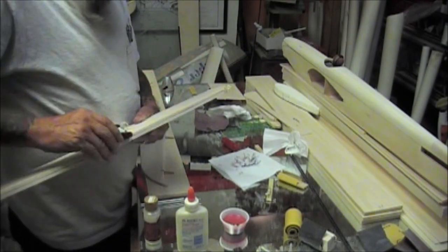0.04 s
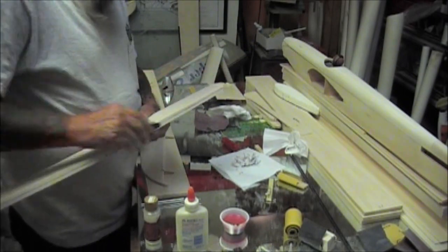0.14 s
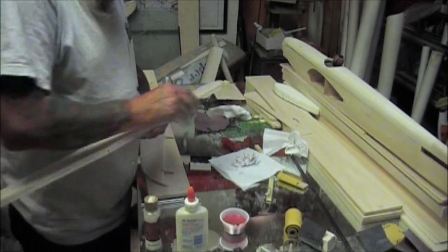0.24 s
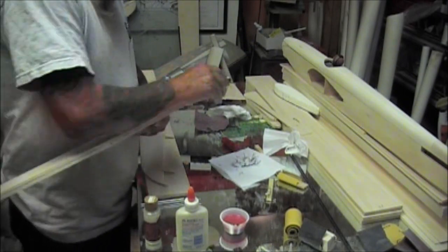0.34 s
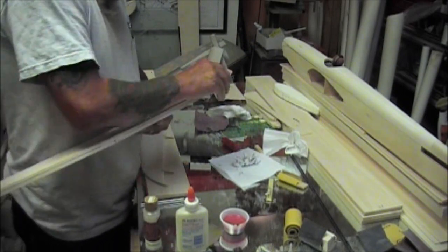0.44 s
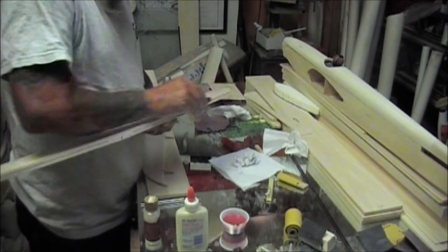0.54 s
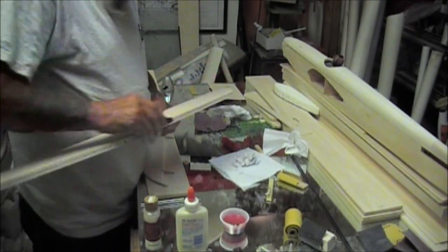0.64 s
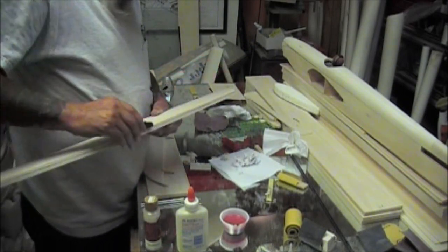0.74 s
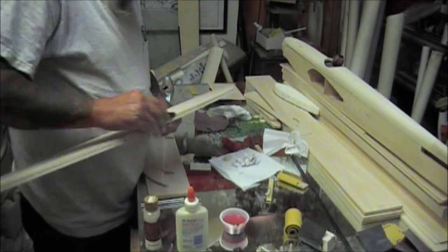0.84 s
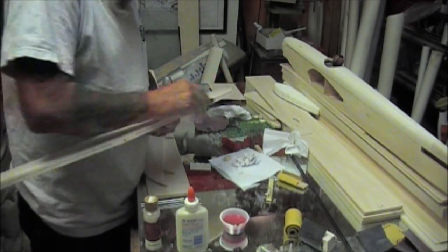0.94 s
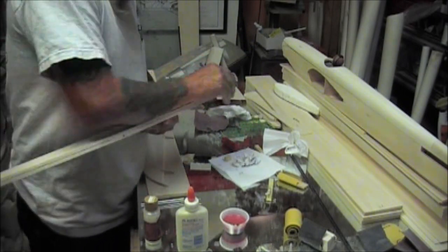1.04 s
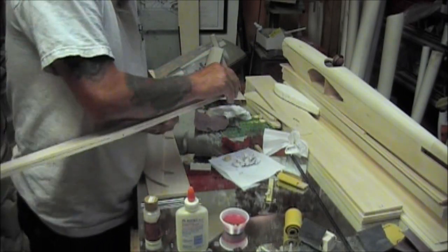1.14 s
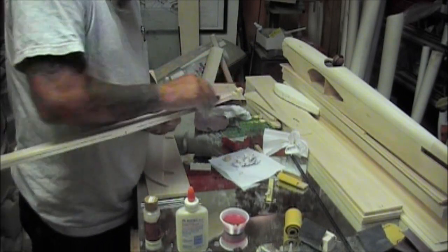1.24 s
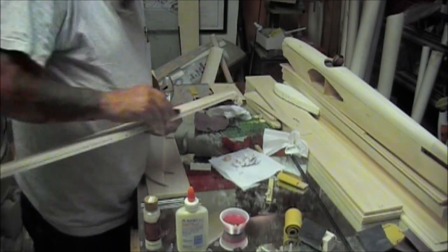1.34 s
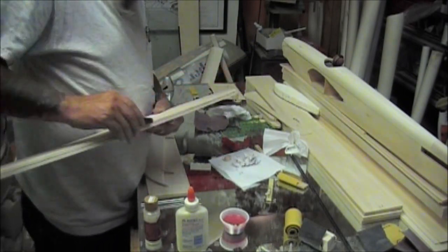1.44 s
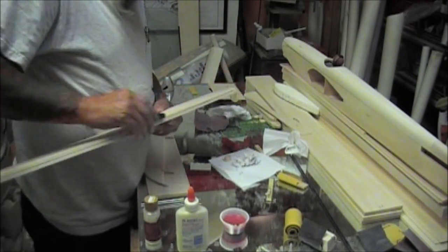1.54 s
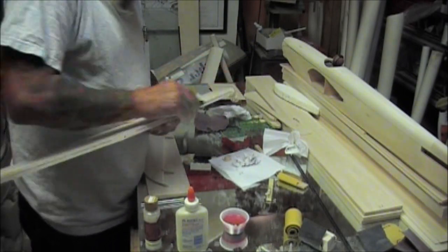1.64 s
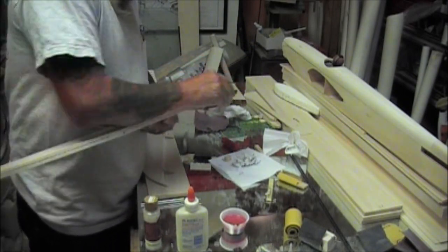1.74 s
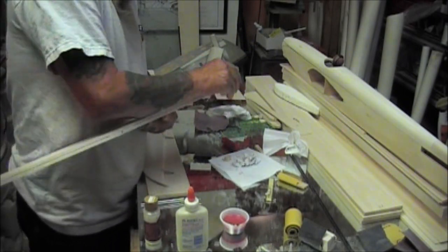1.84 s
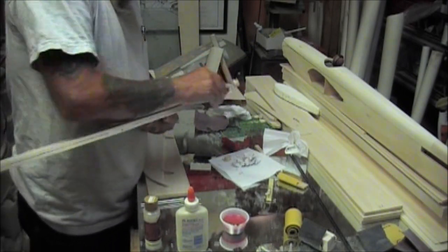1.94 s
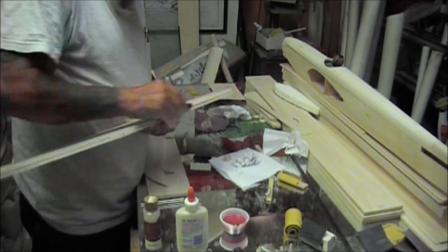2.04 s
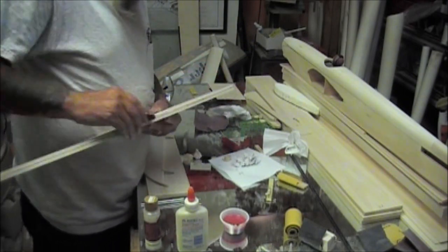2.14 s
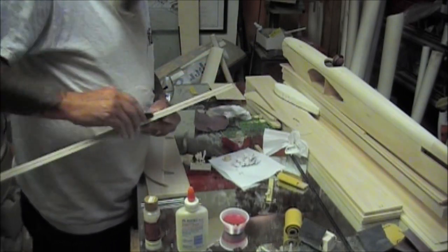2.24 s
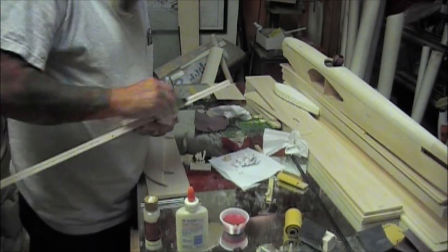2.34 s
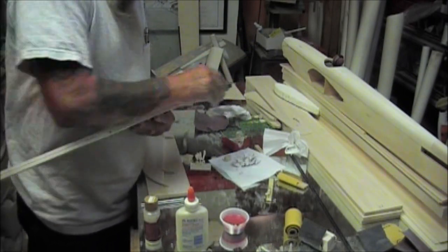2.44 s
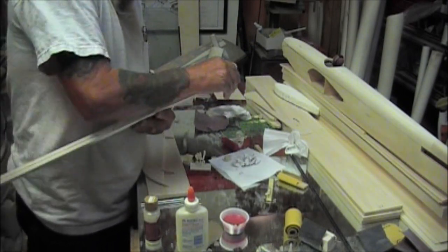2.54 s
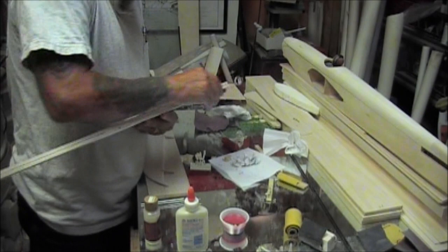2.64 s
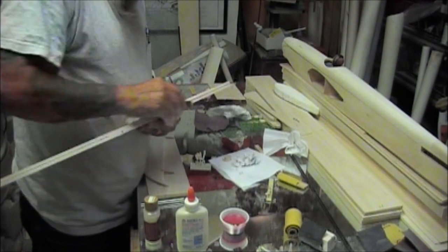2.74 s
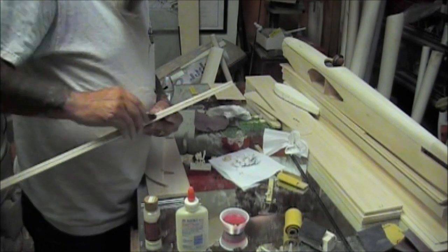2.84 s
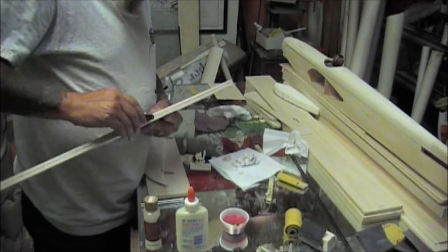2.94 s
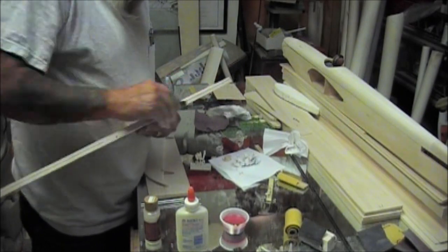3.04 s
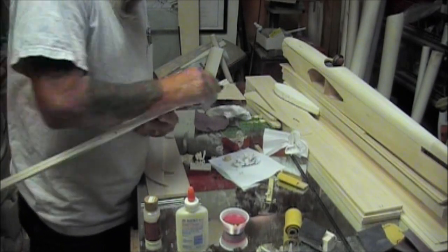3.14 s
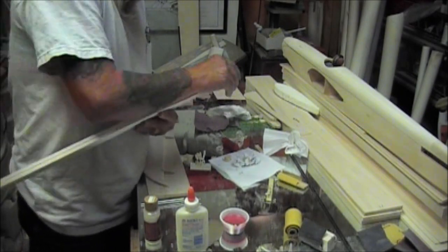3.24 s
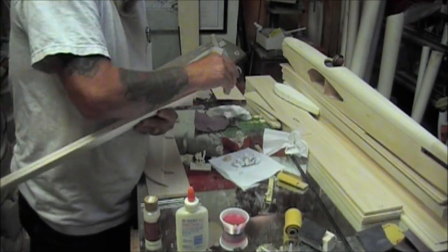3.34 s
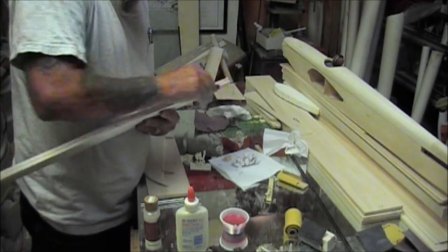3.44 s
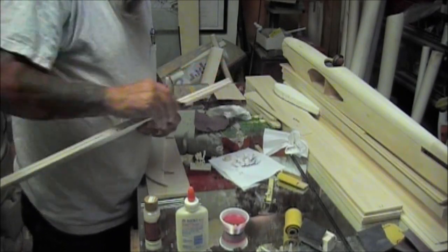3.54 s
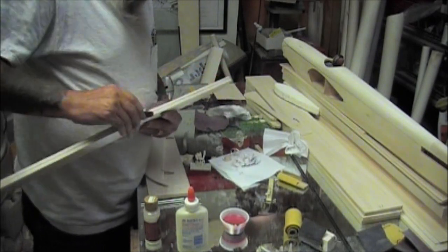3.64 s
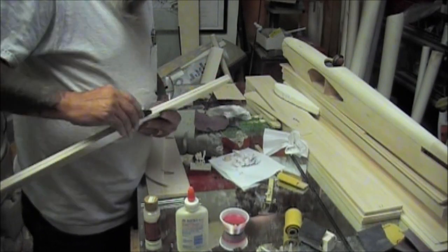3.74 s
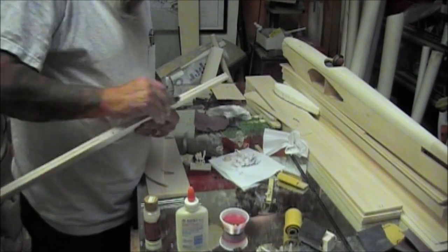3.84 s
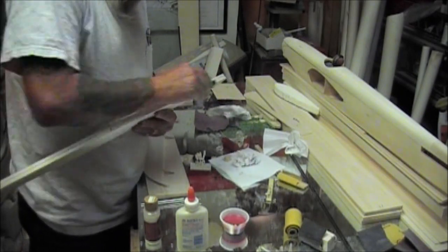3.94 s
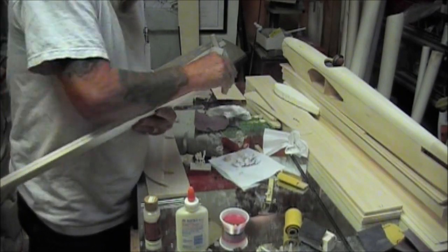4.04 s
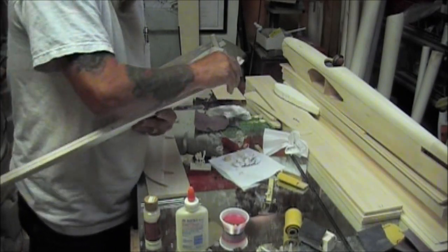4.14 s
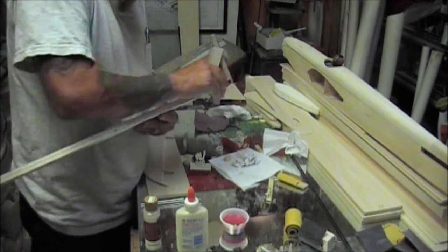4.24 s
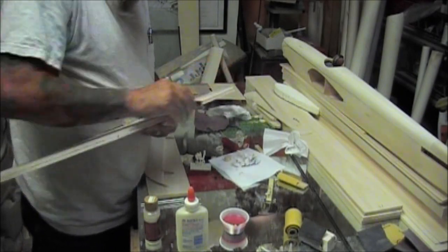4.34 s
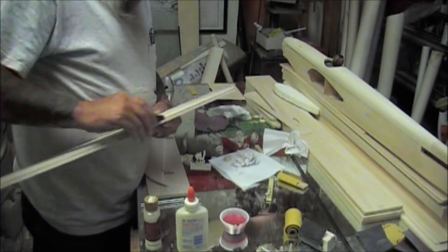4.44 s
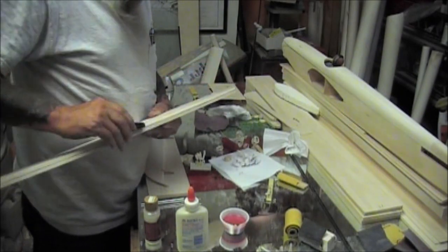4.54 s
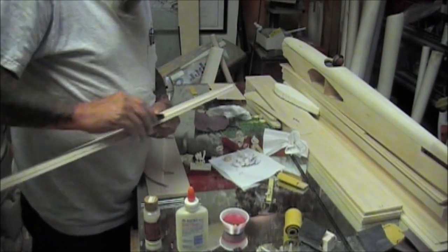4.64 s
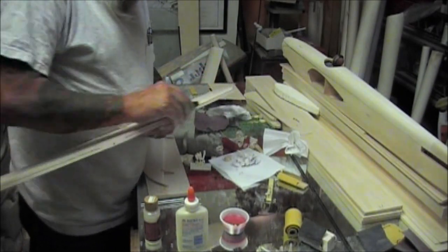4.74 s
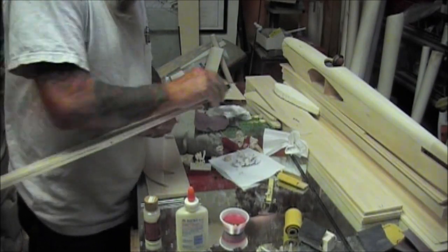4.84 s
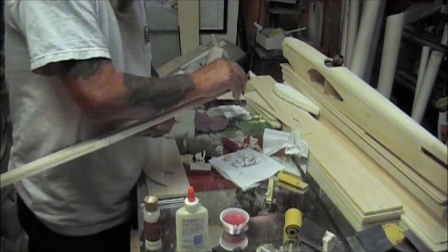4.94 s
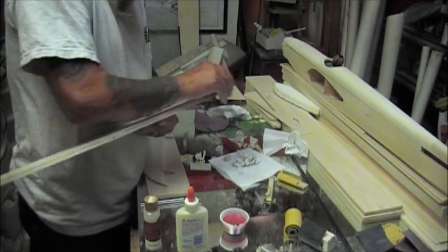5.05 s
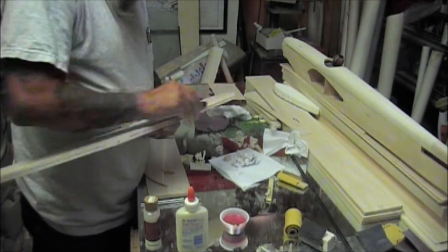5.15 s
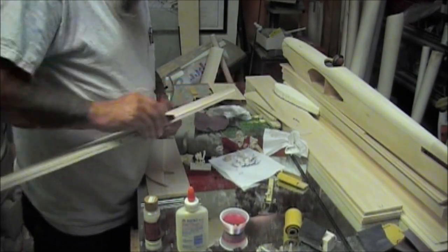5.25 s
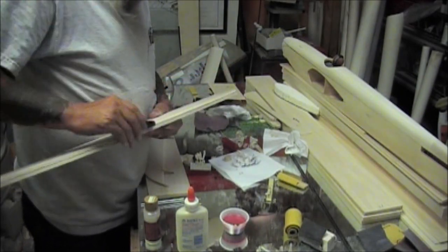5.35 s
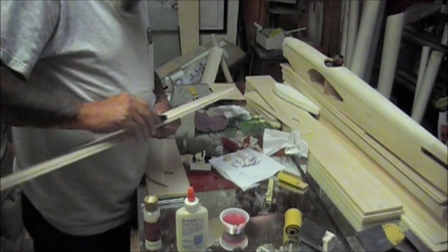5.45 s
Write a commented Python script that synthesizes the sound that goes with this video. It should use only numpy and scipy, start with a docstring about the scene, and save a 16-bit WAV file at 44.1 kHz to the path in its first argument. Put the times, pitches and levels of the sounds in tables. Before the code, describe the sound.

A small hand plane shaves a thin strip of soft wood from the very start, running back and forth in about fifteen quick strokes over five and a half seconds. Each stroke is a gritty, dry hiss lasting roughly a third of a second, with a tiny dip before the next. The blade chatters against the strip, adding a rough, ringing midrange tone, strongest around 0.4, 1.1, 1.8, 2.6, 3.3, 4.1 and 4.9 seconds. Fainter, lower tones come from the flexing wood. The hiss jumps sharply as the blade bites harder grain near 1.7, 2.5, 3.2 and 4 seconds. Short squeaks come at about 0.8 and 3.1 seconds, with the clearest at 4.8. The last stroke fades at 5.5 seconds. The sound is close and centred, with short workshop reverberation and a faint steady hum beneath.

```python
"""A cluttered workshop, where a small hand plane runs to and fro along a thin strip of soft wood.
Brittle fracture of the fibres under the blade makes a gritty hiss, which jumps at harder grain.
The slipping blade forces the strip's modes into chatter and lower flexing tones, and stick-slip
friction of the sole adds brief squeaks. A quiet room hum lies under the strokes, and a pair of
microphones at the side receives the direct sound with a short reverberation."""
import sys
import numpy as np
from scipy import signal
from scipy.fft import rfft, irfft, next_fast_len
from scipy.io import wavfile
from scipy.ndimage import uniform_filter1d

SR = 44100
rng = np.random.default_rng(int(sys.argv[2]) if len(sys.argv) > 2 else 0)


def persist_wave(psi):
    """Save psi, clipped to +-1, as 16-bit WAV."""
    counts = np.round(np.clip(psi, -1, 1) * 32767).astype(np.int16)
    wavfile.write(sys.argv[1], SR, np.atleast_2d(counts).T)


N = 242991
TIME_S = np.arange(N) / SR


def gain_of(db):
    """Decibel law: 20 dB is a factor of ten in amplitude."""
    return 10 ** (np.asarray(db) / 20)

def unit_rms(x):
    """Normalisation to a mean power of 1."""
    return x / np.sqrt(np.mean(x ** 2) + 1e-20)

def curve_at(points, hz):
    """Interpolation on a logarithmic frequency axis."""
    f, value = np.transpose(points)
    return np.interp(np.log(hz + 1), np.log(f + 1), value)

def colour(x, points, share=1):
    """Linear filtering by a gain curve in dB, scaled by share."""
    size = next_fast_len(N + 4096)
    gain = gain_of(share * curve_at(points, np.fft.rfftfreq(size, 1 / SR)))
    return irfft(rfft(x, size) * gain, size)[..., :N]

def resonate(x, hz, *widths_hz):
    """Resonances in series, one per width, by heterodyning: shift hz to zero, smooth, shift back."""
    carrier = np.exp(2j * np.pi * np.cumsum(hz * np.ones(len(x))) / SR)
    for width in widths_hz:
        pole = np.exp(-np.pi * width / SR)
        x = 2 * (carrier * signal.lfilter([1 - pole], [1, -pole], x / carrier + 1e-18)).real
    return x

def ring(x, modes):
    """Modal superposition: fixed resonances add, neighbours with opposite sign."""
    size = next_fast_len(N + 8192)
    hz = np.fft.rfftfreq(size, 1 / SR)
    body = sum((-1) ** k * gain_of(db) * 1j * hz * width / (f ** 2 - hz ** 2 + 1j * hz * width)
               for k, (f, width, db) in enumerate(modes))
    return irfft(rfft(x, size) * body, size)[:N]

def drifting(x, frames, bins, depth):
    """Smooth random modulation of the spectrum: real depth varies amplitude, imaginary depth phase."""
    spectrum = signal.stft(x, nperseg=512, noverlap=384)[2]
    field = rng.standard_normal(spectrum.shape[::-1]).T
    for axis, span in enumerate((bins, frames)):
        field = uniform_filter1d(uniform_filter1d(field, size=span, axis=axis), size=span, axis=axis)
    return signal.istft(spectrum * np.exp(depth * unit_rms(field)), nperseg=512, noverlap=384)[1][:N]

def impulses(per_s, spread_db, lumpy_db, lump_s):
    """Shot noise: random clicks of uneven size, stronger in lumps where the grain is denser."""
    size = gain_of(spread_db * np.minimum(rng.exponential(1, N), 5)) * rng.standard_normal(N)
    window = np.hanning(max(round(lump_s * SR), 3))
    lumps = unit_rms(signal.oaconvolve(rng.standard_normal(N), window, "same"))
    return unit_rms(size * (rng.random(N) < per_s / SR) * gain_of(lumpy_db * lumps))


# Spectrum of the room noise: frequency_hz, relative_density_db
AIR_SPECTRUM = [(18, -83), (30, -35), (198, -11), (237, -10.5), (457, -3.5), (521, -36), (659, -5.5),
                (1300, -6), (3170, -6.5), (3520, -9), (10300, -13.5), (13700, -24), (15700, -34)]
# Faint hum: pitch_hz, level_db
HUM_TONES = [(247.6, -71)]
# Envelope of the low drone: time_s, level_db
DRONE_LEVELS = [(0.0, -75.5), (0.57, -79), (0.77, -74), (1.24, -88), (1.49, -74.5), (2.79, -91),
                (3.22, -85), (4.53, -87), (5.51, -85)]

def room_hum(air_db=-56.5, drone_hz=136):
    """Filtered noise: a broad band is heard as steady air, narrow bands as a wavering hum and drone."""
    air = gain_of(air_db) * unit_rms(colour(rng.standard_normal(N), AIR_SPECTRUM))
    for hz, db in HUM_TONES:
        air += gain_of(db) * unit_rms(resonate(rng.standard_normal(N), hz, 22.6))
    drone = resonate(rng.standard_normal(N), drone_hz, 25, 25)
    return air + unit_rms(drone) * gain_of(np.interp(TIME_S, *np.transpose(DRONE_LEVELS)))


# Hiss envelopes, one list of points per stroke: time_s, level_db
STROKE_LEVELS = [
    [(0, -31), (.064, -37.5), (.114, -41), (.17, -69)],
    [(.195, -57.5), (.22, -44.5), (.273, -37), (.331, -30.5), (.46, -36.5), (.509, -39), (.565, -60)],
    [(.572, -54), (.604, -41), (.664, -40.5), (.73, -34), (.804, -37), (.866, -53.5), (.89, -54)],
    [(.895, -52.5), (.925, -39.5), (.967, -35), (1.025, -27.5), (1.06, -29.5), (1.175, -32.5),
     (1.233, -48.5), (1.265, -60)],
    [(1.27, -56), (1.304, -40.5), (1.39, -39), (1.45, -32.5), (1.518, -40.5), (1.6, -57)],
    [(1.612, -61), (1.638, -40.5), (1.74, -27), (1.8, -28.5), (1.934, -38), (1.99, -62)],
    [(2.02, -56), (2.056, -40), (2.12, -37), (2.2, -33.5), (2.27, -47), (2.31, -59)],
    [(2.355, -62), (2.395, -40.5), (2.458, -35), (2.5, -33.5), (2.613, -33.5), (2.68, -58)],
    [(2.685, -50), (2.733, -40.5), (2.82, -39), (2.872, -41), (2.905, -35), (2.965, -50), (3.0, -50),
     (3.02, -62)],
    [(3.055, -66), (3.08, -49), (3.135, -44), (3.168, -33.5), (3.21, -29), (3.275, -33.5), (3.33, -32),
     (3.386, -39), (3.44, -64)],
    [(3.465, -59), (3.501, -40.5), (3.54, -37), (3.63, -39), (3.691, -36.5), (3.78, -57.5)],
    [(3.835, -64), (3.865, -46.5), (3.966, -35.5), (4.02, -32.5), (4.114, -32.5), (4.188, -35),
     (4.255, -63)],
    [(4.315, -56), (4.341, -46), (4.47, -36.5), (4.541, -34.5), (4.61, -40.5), (4.65, -45), (4.685, -62)],
    [(4.695, -58), (4.731, -41), (4.79, -34.5), (4.825, -30.5), (4.917, -31.5), (5.03, -37), (5.095, -66)],
    [(5.15, -63), (5.17, -43), (5.25, -37.5), (5.302, -35), (5.368, -35), (5.434, -43.5), (5.5, -64)],
]

def strokes():
    """Reciprocating motion: hiss level, stroke number, progress 0-1 and contact with the wood 0-1."""
    stroke, progress, contact = np.zeros(N, int), np.zeros(N), np.zeros(N)
    for k, points in enumerate(STROKE_LEVELS):
        start_s, end_s = points[0][0], points[-1][0]
        begun = TIME_S > start_s - 0.01
        contact[begun & (TIME_S < end_s + 0.01)] = 1
        progress[begun] = np.clip((TIME_S[begun] - start_s) / (end_s - start_s), 0, 1)
        stroke[begun] = k
    hiss_db = np.interp(TIME_S, *np.concatenate(STROKE_LEVELS).T)
    return hiss_db, stroke, progress, uniform_filter1d(contact, size=600)


# Modes of the plane's body and blade: frequency_hz, bandwidth_hz, gain_db
PLANE_MODES = [(2696, 300, -15), (3664, 120, -1), (4610, 67, -17), (4270, 65, -1.5), (6320, 52, -13)]
# Spectral shaping of the snapping fibres: frequency_hz, gain_db
GRIT_SPECTRUM = [(300, -38.5), (600, -18), (1200, -4.5), (2000, 0), (3000, -2.5), (5000, -3), (7500, -7.5),
                 (11200, -10), (13000, -17.5), (15700, -26)]

def fibre_hiss(slide, bite, rasp_hz, fizz_db, bite_fizz_db=-2.5, fizz_above_hz=7500):
    """Brittle fracture: snapping fibres make broadband noise and excite the modes of the plane."""
    fibres = impulses(per_s=22000, spread_db=-0.5, lumpy_db=0.57, lump_s=0.017)
    grit = fibres + 3.84 * ring(fibres, PLANE_MODES) + 1.17 * resonate(fibres, rasp_hz, 750)
    # the curling shaving colours the hiss in patches that come and go
    grit = drifting(colour(grit, GRIT_SPECTRUM), frames=12, bins=2, depth=0.3)
    low = signal.sosfilt(signal.butter(2, fizz_above_hz, fs=SR, output="sos"), grit[::-1])[::-1]
    low = signal.sosfilt(signal.butter(2, fizz_above_hz, fs=SR, output="sos"), low)  # zero net phase
    hiss = unit_rms(low) * gain_of(-2) * np.hypot(slide, bite)
    fizz = unit_rms(grit - low) * np.hypot(slide * gain_of(fizz_db), bite * gain_of(bite_fizz_db))
    return hiss + fizz


def with_spells(light, light_hz, spells, light_uneven=0, fall_db=-8.5):
    """Incoherent addition: spells add power to a light layer; pitch and unevenness average by power."""
    power = light ** 2
    pitch_sum, uneven_sum = power * light_hz, power * light_uneven
    for peak_s, half_s, db, hz, glide, *uneven in spells:
        near = np.arange(max(round((peak_s - 3 * half_s) * SR), 0),
                         min(round((peak_s + 3 * half_s) * SR), N))
        offset = (near / SR - peak_s) / half_s
        spell = gain_of(db + fall_db * offset ** 2) ** 2
        power[near] += spell
        pitch_sum[near] += spell * (hz + glide * half_s * np.clip(offset, -2, 2))
        uneven_sum[near] += spell * sum(uneven)
    return np.sqrt(power), pitch_sum / power, uneven_sum / power

def radiated(x, cutoff_hz):
    """Acoustic short circuit: a narrow strip radiates little bass. The result is held near rms 1."""
    x = signal.sosfilt(signal.butter(4, cutoff_hz, "high", fs=SR, output="sos"), x)
    # the hand sets the level, whatever modes the pitch meets
    return x / np.sqrt(uniform_filter1d(x ** 2, size=5000) + 1e-12)


# Modes of the wooden strip: frequency_hz, bandwidth_hz, gain_db
STRIP_MODES = [(344, 96, 5.5), (389, 39, -24), (518, 11.6, 2.5), (677, 13, -33), (740.5, 32.6, 6.5),
               (903.5, 14.4, 12), (956.2, 10.1, 15), (1079, 58, 9), (1250, 85, 5.5), (1341, 78, 6),
               (1401.7, 18.4, 8.5), (1517, 48, 7.5), (1693, 43, 0.5), (1823, 29, 7.5), (1953, 23, 1),
               (2060, 47, 4.5), (2269, 15, 0)]
# Spells of hard chatter: peak_s, half_length_s, level_db, pitch_hz, glide_hz_per_s, unevenness_ratio
CHATTER_SPELLS = [(0.089, 0.037, -40.5, 1510, -1000, 0.65), (0.323, 0.065, -29.5, 1390, -1000, 0.45),
                  (.425, 0.047, -27, 1410, 1500, .3), (0.795, 0.025, -31.5, 900, 300, 0.2),
                  (1.04, 0.049, -26.5, 1450, -600, 0.1), (1.125, .055, -24.5, 1430, 2000, .5),
                  (1.456, 0.05, -37, 1280, 300, 0.6), (1.76, 0.04, -23, 1390, -1500, 0.08),
                  (1.83, 0.048, -25, 1380, 2000, .3), (2.11, 0.029, -34.5, 2100, -2000, 0.6),
                  (2.193, 0.047, -38.5, 1390, 300, 0.5), (2.487, 0.014, -32, 1490, 300, 0),
                  (2.565, 0.035, -24.5, 1560, -300, 0), (2.915, 0.026, -42.5, 1460, 300, .5),
                  (3.22, 0.036, -27, 1450, 300, 0.02), (3.275, 0.054, -23.5, 1510, -600, 0.22),
                  (3.571, 0.064, -40, 1860, -300, 0.4), (4.12, 0.039, -24.5, 1580, 800, 0.05),
                  (4.469, 0.051, -39, 1190, -1000, 0.7), (4.585, 0.037, -36, 980, -300, 0.1),
                  (4.84, 0.048, -27, 1200, 4000, 0.53), (4.945, 0.058, -24, 1516, 3501, 0.06),
                  (5.218, 0.024, -34.5, 2300, -2000, 0.4), (5.3, 0.054, -37.5, 1280, -500, .5),
                  (5.38, 0.058, -34, 1250, -3500, .5)]

def blade_chatter(slips, light_db, light_hz):
    """Forced vibration: the blade slips at an uneven rate and the strip selects its own modes."""
    level, hz, uneven = with_spells(gain_of(light_db), light_hz, CHATTER_SPELLS, light_uneven=0.72)
    narrow = resonate(slips, hz, 660, 780, 930)
    wide = resonate(slips, hz, 970, 1100)
    drive = (1 - uneven) * narrow + 2.44 * uneven * wide
    # the travelling plane crosses the nodes of some modes and the antinodes of others
    rung = drifting(ring(drive, STRIP_MODES) + 0.51 * drive, frames=10, bins=2, depth=0.28)
    return radiated(rung, cutoff_hz=664) * level


# Spells of strong bending: peak_s, half_length_s, level_db, pitch_hz, glide_hz_per_s
FLEX_SPELLS = [(0.356, 0.091, -36.5, 723, -100), (0.5, .03, -44, 600, -500), (.77, 0.043, -45, 705, -500),
               (1.052, 0.11, -50, 647, 502.5), (1.836, 0.027, -47, 605, 300),
               (1.927, 0.027, -53, 660, -500), (2.903, 0.026, -51, 630, -500),
               (3.349, 0.035, -45, 563, -3000), (4.17, 0.035, -43.5, 575, -1500),
               (4.467, 0.038, -48, 640, -500), (4.58, 0.027, -48, 530, 300), (4.812, 0.034, -44, 595, 1000),
               (5.04, 0.021, -50, 636, -300), (5.186, 0.016, -46, 635, -300),
               (5.402, 0.055, -46, 590, -1800)]

def strip_flex(slips, hiss_db, progress, ends_hz=494, middle_hz=652):
    """Flexural vibration: slower slips bend the whole strip in its lowest modes."""
    # bending follows the hiss and grows as the plane slows late in the stroke
    light_db = -60 + 0.61 * (hiss_db + 40) + 1.5 * progress ** 2
    light_hz = ends_hz + (middle_hz - ends_hz) * np.sin(np.pi * progress)
    level, hz, _ = with_spells(gain_of(light_db), light_hz, FLEX_SPELLS)
    bend = resonate(slips, hz, 230, 314)
    return radiated(ring(bend, STRIP_MODES) + 0.5 * bend, cutoff_hz=330) * level


# Squeaks of the sole: start_s, length_s, start_hz, end_hz, level_db
SOLE_SQUEAKS = [(0.753, 0.099, 920, 943, -33), (3.142, 0.045, 1420, 1414, -35.5),
                (3.337, 0.045, 597, 404, -51), (3.925, 0.05, 946, 965, -40.5),
                (4.157, 0.057, 566, 485, -49), (4.531, 0.049, 382, 470, -51.5),
                (4.54, 0.11, 965, 940, -41.5), (4.774, 0.039, 510, 520, -50), (4.796, 0.037, 963, 947, -28),
                (5.164, 0.05, 690, 670, -55), (5.385, 0.054, 506, 497, -49), (5.418, 0.055, 943, 966, -49)]

def sole_squeaks():
    """Stick-slip friction: the sole locks to one mode of the strip, and a narrow tone swells and dies."""
    out = np.zeros(N)
    for start_s, length_s, start_hz, end_hz, db in SOLE_SQUEAKS:
        friction = rng.standard_normal(SR // 4)
        progress = np.minimum(np.arange(len(friction)) / SR / length_s, 1)
        tone = resonate(friction, start_hz + (end_hz - start_hz) * progress, 40, 58)
        tone /= np.sqrt(uniform_filter1d(tone ** 2, size=1200))
        swell = np.sin(np.pi * progress) ** 1.5
        span = out[round(start_s * SR):][:len(tone)]
        span += (gain_of(db) * swell * tone)[:len(span)]
    return out


# Patches of harder grain: start_s, level_db, length_s
HARD_PATCHES = [(1.741, -31, 0.028), (2.179, -38, 0.03), (2.464, -28, 0.028), (2.877, -35, 0.023),
                (3.171, -28, 0.04), (3.973, -28.5, 0.04), (5.176, -67, 0.032), (5.351, -45, 0.017)]

def blade_bites(attack_s=0.0012, release_s=0.0026):
    """Exponential rise and decay: the envelope of added hiss as the blade bites into harder grain."""
    envelope = np.zeros(N)
    for start_s, db, length_s in HARD_PATCHES:
        age_s = np.maximum(TIME_S - start_s, 0)
        rise = 1 - np.exp(-age_s / attack_s)
        envelope += gain_of(db) * rise * np.exp(-np.maximum(age_s - length_s, 0) / release_s)
    return envelope


# Pitch glides in each direction: chatter_start_hz, chatter_end_hz, rasp_start_hz, rasp_end_hz
RETURN_GLIDES = (1730, 1300, 3350, 3400)
PUSH_GLIDES = (1410, 1540, 4050, 3430)
# Grain under each stroke: chatter_over_hiss_db, rasp_middle_hz, fizz_over_hiss_db
STROKE_GRAIN = [(-9.5, 3700, -8.5), (-5.5, 3350, -3), (-7, 3800, -7), (-12.5, 3620, -6.5), (-8.5, 3930, -7),
                (-7, 3750, -6.5), (-11, 4100, -8), (-8, 3640, -4), (-8.5, 4500, -8), (-9, 3500, -5.5),
                (-7.5, 4500, -8), (-6.5, 3700, -5), (-11, 3850, -9), (-6, 3320, -5.5), (-7, 3750, -8.5)]

def hand_plane():
    """Superposition of hiss, chatter and flex over alternating strokes, a return first."""
    hiss_db, stroke, progress, contact = strokes()
    glides = np.array([RETURN_GLIDES, PUSH_GLIDES])[stroke % 2]
    chatter_start_hz, chatter_end_hz, rasp_start_hz, rasp_end_hz = glides.T
    chatter_db, rasp_middle_hz, fizz_db = np.array(STROKE_GRAIN)[stroke].T
    rasp_hz = rasp_start_hz + (rasp_end_hz - rasp_start_hz) * progress
    rasp_hz += (rasp_middle_hz - (rasp_start_hz + rasp_end_hz) / 2) * np.sin(np.pi * progress)
    chatter_hz = chatter_start_hz + (chatter_end_hz - chatter_start_hz) * progress
    hiss = fibre_hiss(gain_of(hiss_db) * contact, blade_bites(), rasp_hz, fizz_db)
    slips = impulses(per_s=6000, spread_db=3.5, lumpy_db=0.5, lump_s=0.0041)
    chatter = blade_chatter(slips, hiss_db + chatter_db, chatter_hz)
    flex = strip_flex(slips, hiss_db, progress)
    return hiss + (chatter + flex) * contact


# Reverberation time of the workshop: frequency_hz, t60_s
ROOM_DECAY = [(300, 0.39), (1500, 0.12), (5000, 0.19), (14000, 0.12)]

def reverberation(x, delay_s, slot=12):
    """Diffuse reflection: one echo of random sign per slot of samples, each band dying at its own rate."""
    taps = np.zeros(SR // 2)
    slots = np.arange(round(delay_s * SR), len(taps) - slot, slot)
    taps[slots + rng.integers(0, slot, len(slots))] = rng.choice([-1., 1.], len(slots))
    hz, t, spectrum = signal.stft(taps, SR, nperseg=128)
    decay = gain_of(-60 * t / curve_at(ROOM_DECAY, hz)[:, None])
    response = signal.istft(spectrum * decay, SR, nperseg=128)[1]
    return signal.fftconvolve(x, response / np.linalg.norm(response))[:N]


# Filter on the sound that differs between the microphones: frequency_hz, gain_db
SIDE_SPECTRUM = [(60, -16), (200, -29), (380, -27), (1290, -27.5), (2380, -34), (4400, -21.5), (8120, -14),
                 (10500, -11.5), (13000, -9), (15000, -13)]
# Channel balance: frequency_hz, left_over_right_db
BALANCE = [(200, 0), (2400, -0.3), (4400, -0.3), (8000, -1.4), (15000, -1.5)]

def scene():
    """Mid-side stereo: the microphones share the direct sound, while reflections differ between them."""
    direct = hand_plane() + sole_squeaks()
    mid_echo = reverberation(direct, delay_s=0.006)
    side_echo = reverberation(direct, delay_s=0.0032)
    mid = direct + gain_of(-12.5) * mid_echo + room_hum()
    # near reflections shift in phase as the arm moves
    shifting = drifting(direct, frames=15, bins=6, depth=3j)
    side = colour(shifting + gain_of(4.5) * side_echo + gain_of(13.5) * room_hum(), SIDE_SPECTRUM)
    return np.array([colour(mid + side, BALANCE, share=0.5), colour(mid - side, BALANCE, share=-0.5)])

def record(dry):
    """Band limiting: a bass cut, then a steep treble cut."""
    low_hz, high_hz = 95, 15740
    cut = signal.sosfilt(signal.butter(3, low_hz, "high", fs=SR, output="sos"), dry)
    return signal.oaconvolve(cut, signal.firwin(1023, high_hz, window=("kaiser", 9), fs=SR)[None], "same")


dry = scene()
out = record(dry)
persist_wave(out)
```